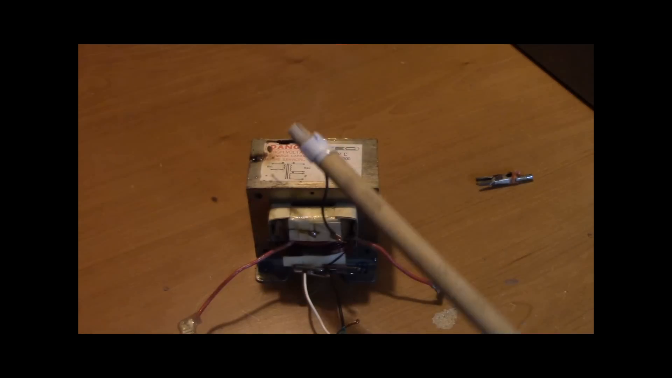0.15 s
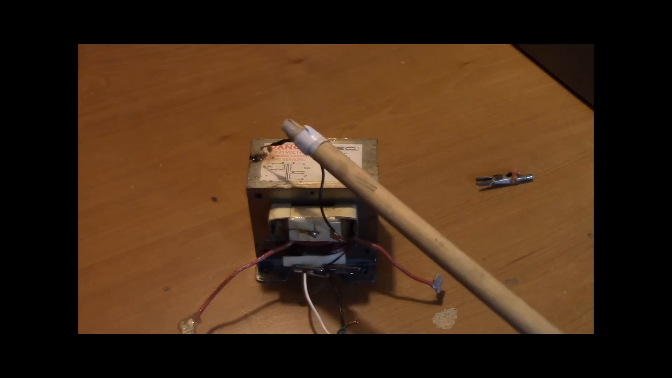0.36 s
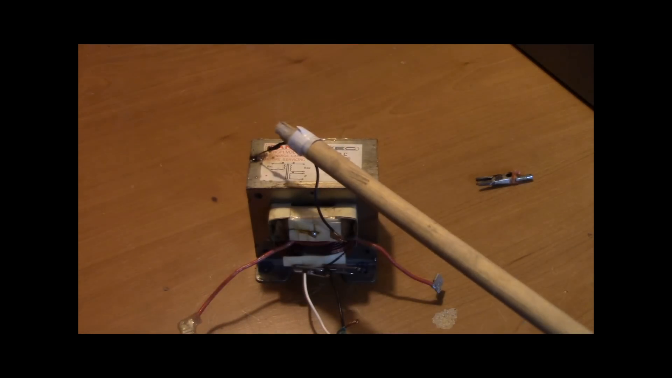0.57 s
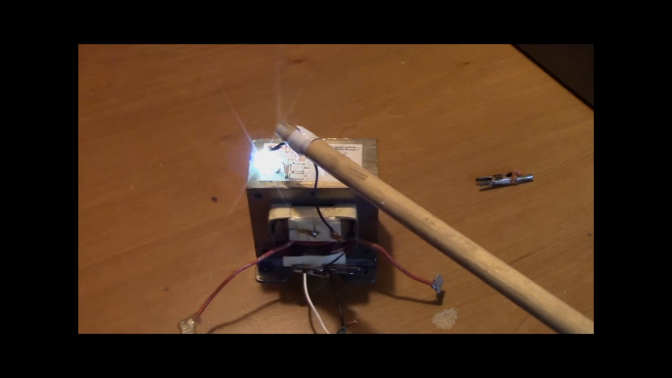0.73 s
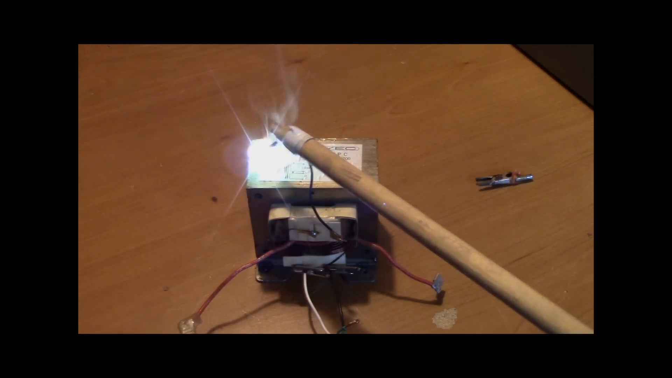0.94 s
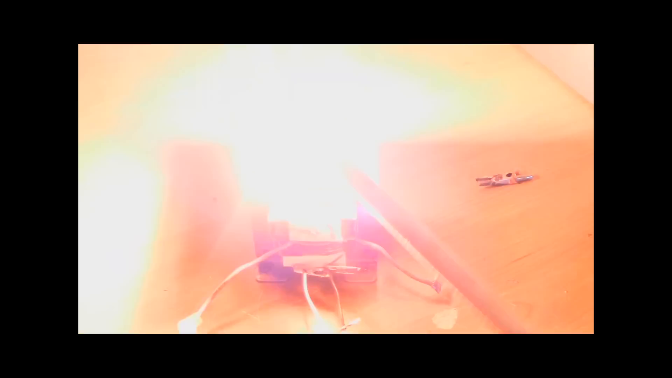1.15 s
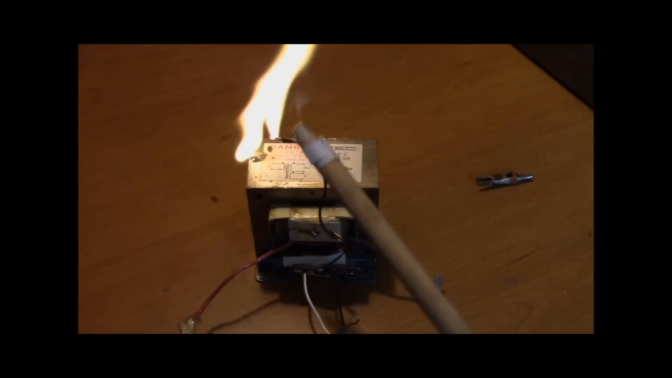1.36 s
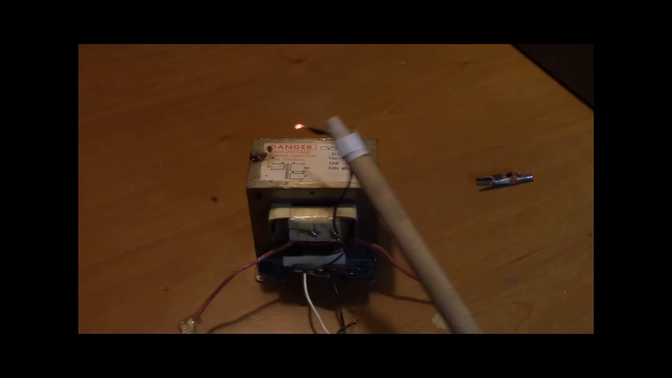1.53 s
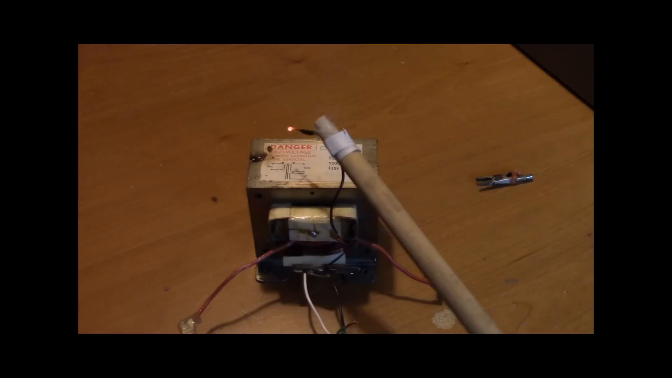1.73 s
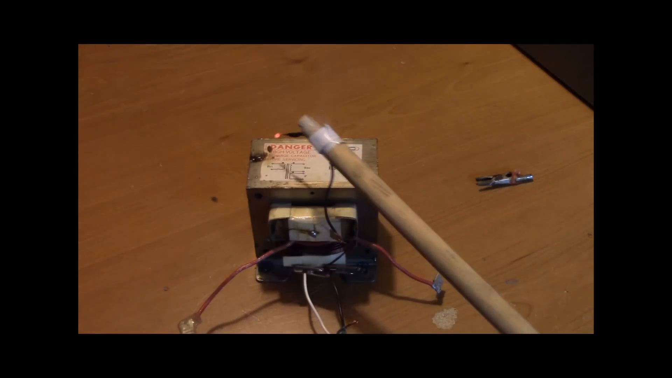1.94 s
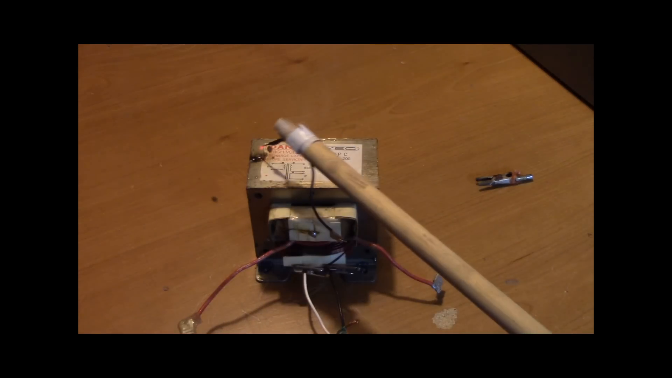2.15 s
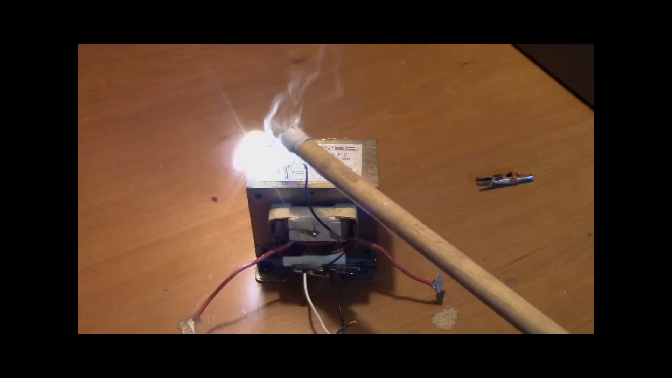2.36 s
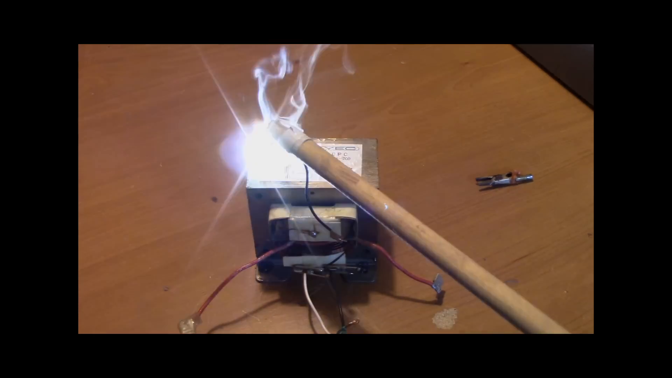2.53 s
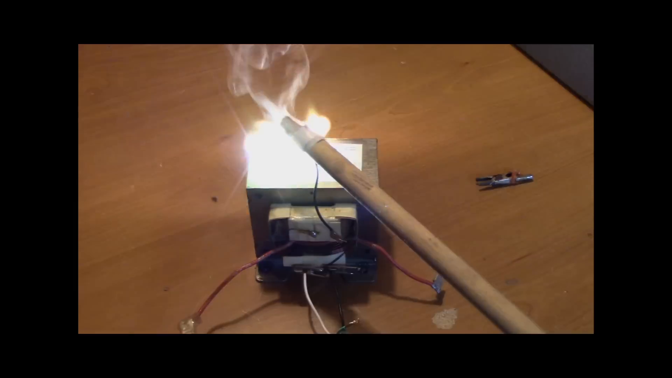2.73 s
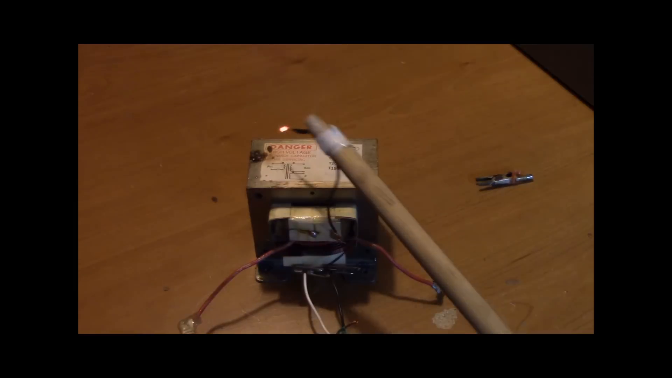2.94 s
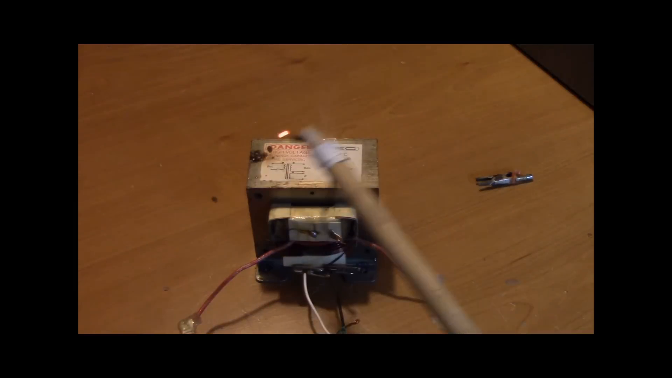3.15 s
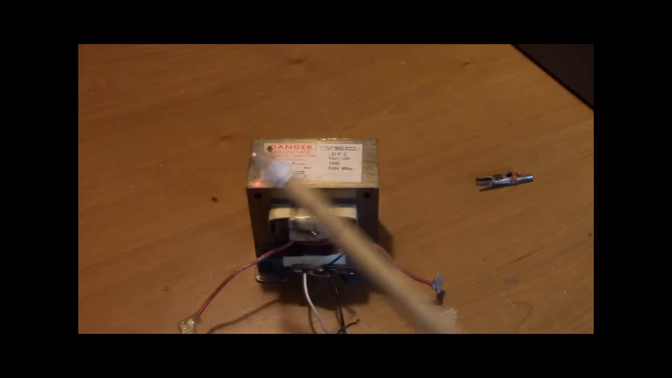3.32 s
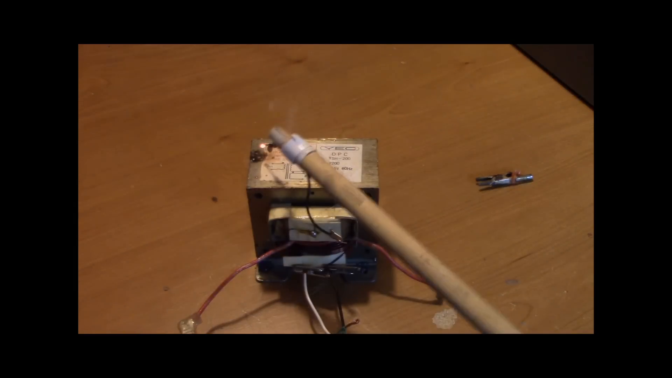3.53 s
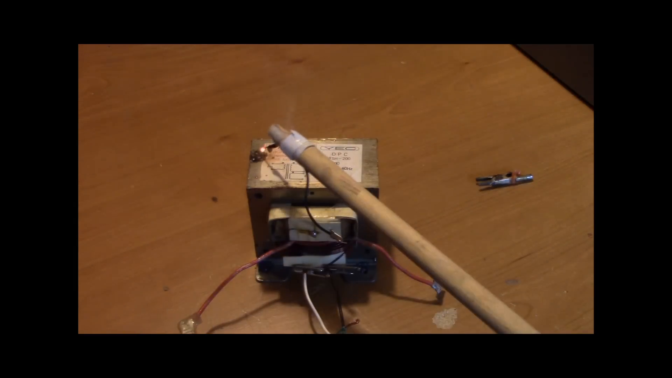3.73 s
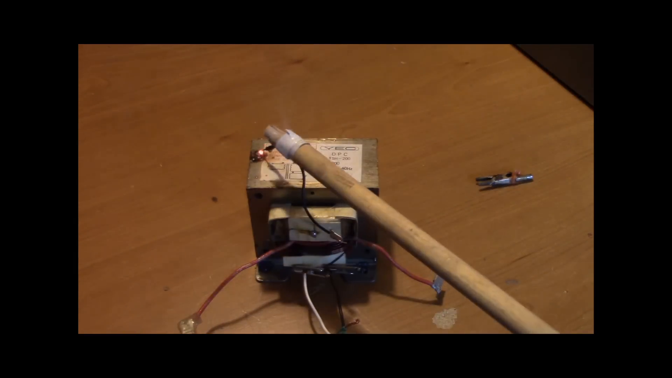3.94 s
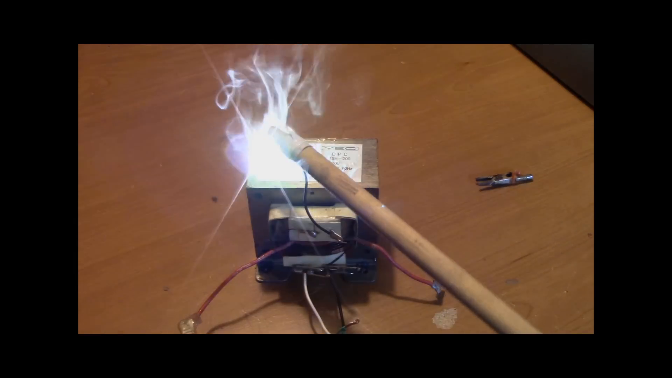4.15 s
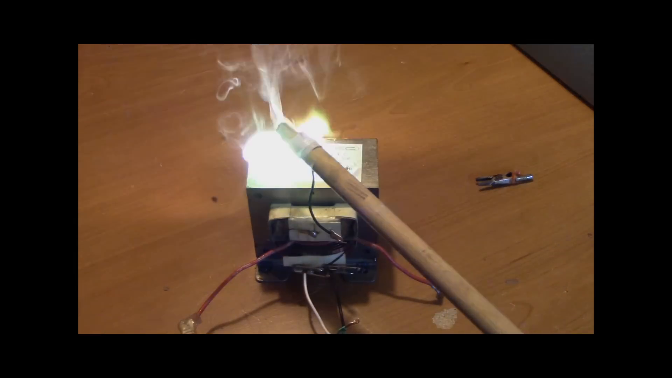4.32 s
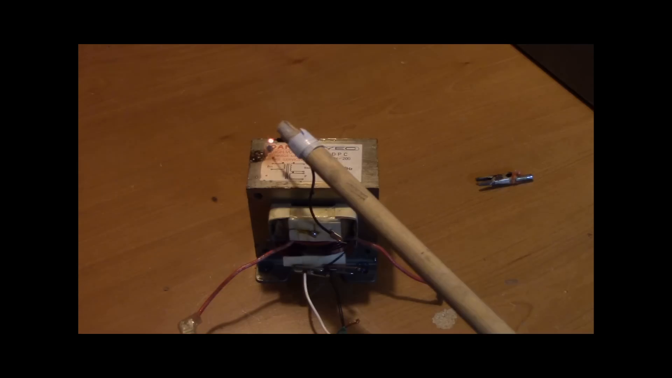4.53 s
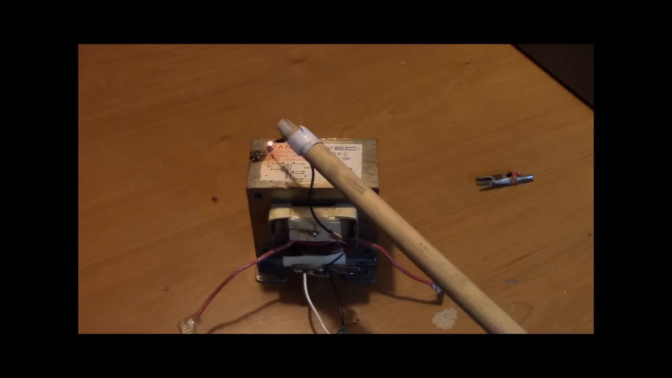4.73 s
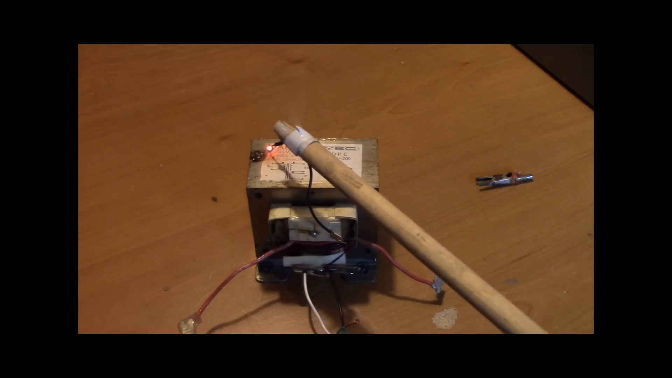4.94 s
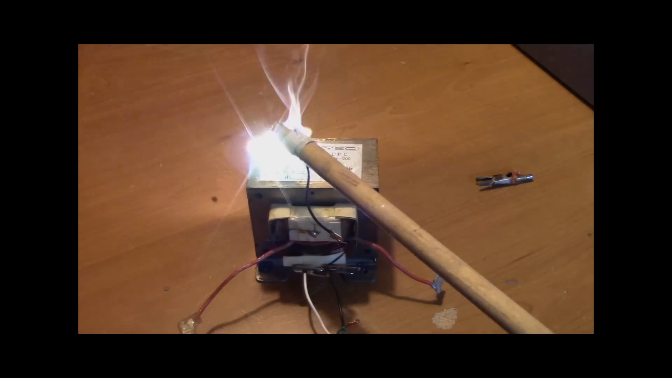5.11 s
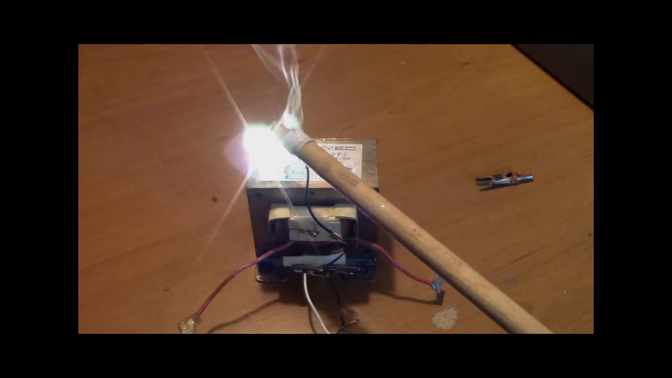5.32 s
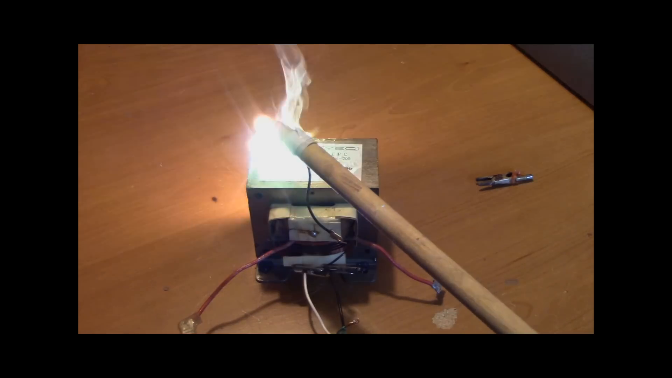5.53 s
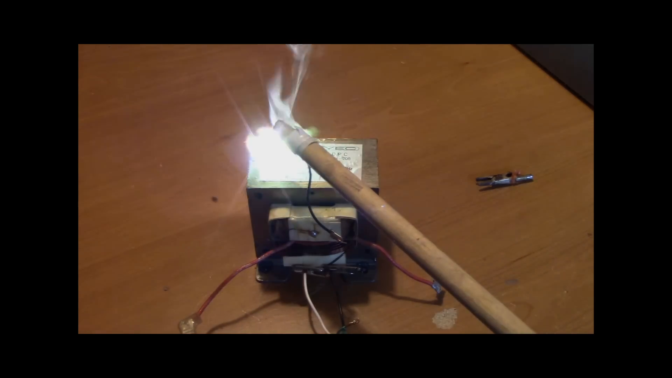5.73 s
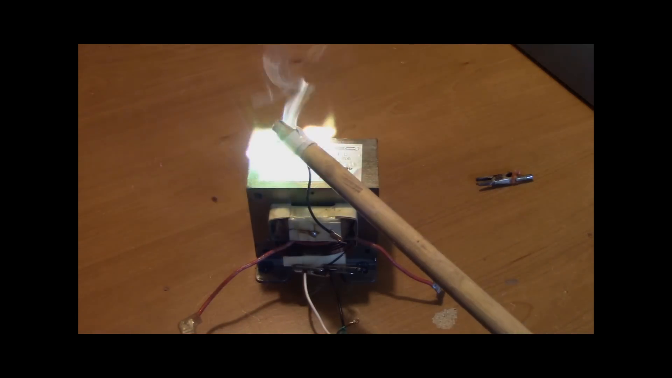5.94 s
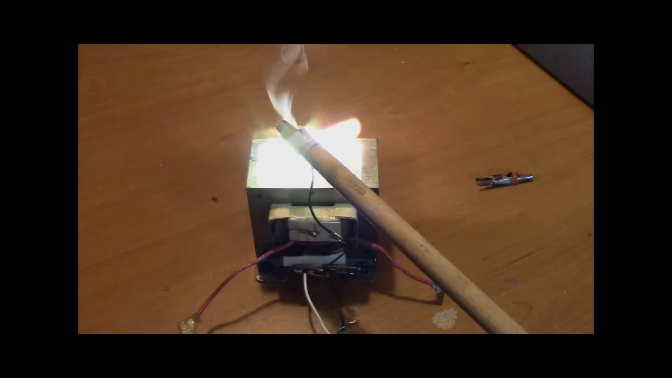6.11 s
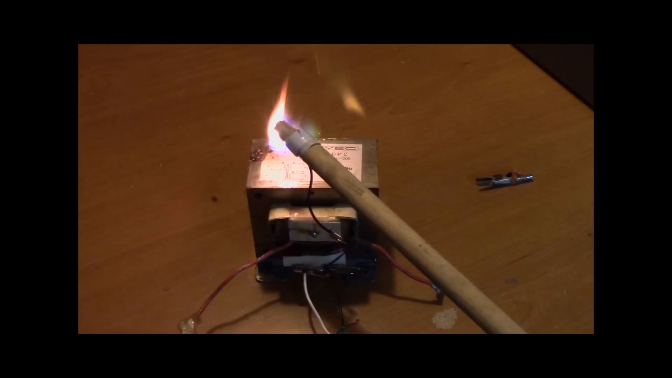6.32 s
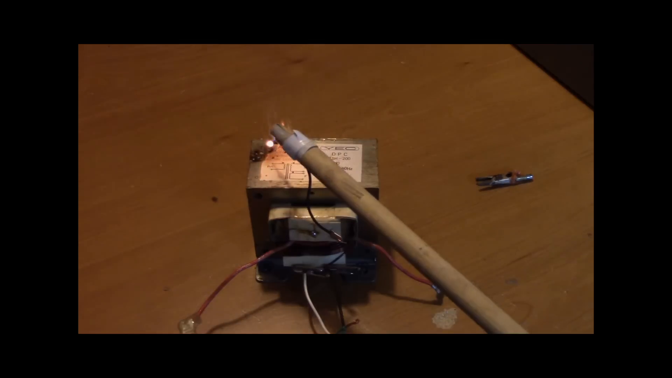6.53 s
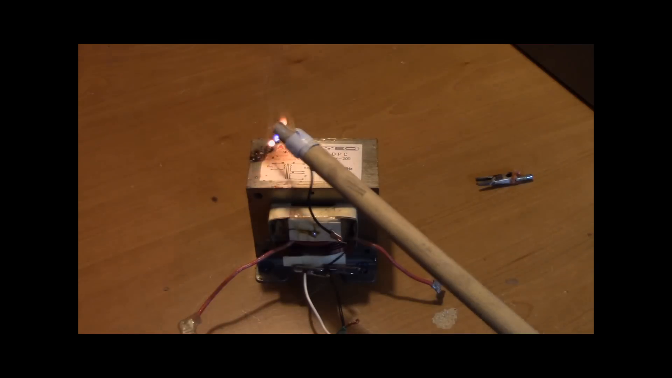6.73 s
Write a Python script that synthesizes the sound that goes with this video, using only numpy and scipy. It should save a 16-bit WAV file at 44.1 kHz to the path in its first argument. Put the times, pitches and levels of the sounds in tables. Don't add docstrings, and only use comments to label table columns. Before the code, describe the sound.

A transformer hums low and steadily on a wooden desk in a small room. Electric arcs catch with weak ticks, then explode into loud, rapid, buzzing snaps, sizzle and dull thumps, stopping abruptly. Several bursts of different length follow, the last the longest. In the quiet gaps, thin high whistles slide down and hot metal ticks faintly. Close single microphone, loudest spikes saturated.

```python
import sys
import numpy as np
from scipy import signal
from scipy.fft import rfft, irfft
from scipy.io import wavfile

SR = 44100
rng = np.random.default_rng(int(sys.argv[2]) if len(sys.argv) > 2 else 0)


def store_pcm(level_fs):
    pcm = np.round(np.clip(level_fs, -1, 1) * 32767).astype(np.int16)
    wavfile.write(sys.argv[1], SR, np.atleast_2d(pcm).T)


def gain_from_db(level_db):
    decades = np.asarray(level_db, float) / 20
    return 10 ** decades


N = 302967
TIME = np.arange(N) / SR
MAINS_HZ = 60.01
PEAK_PHASE = 0.17


def rms_one(x):
    return x / np.sqrt(np.mean(x ** 2) + 1e-20)


def at_hz(points, hz):
    table_hz, values = np.transpose(points)
    return np.interp(np.log(hz + 1), np.log(table_hz), values)


def coloured(spectrum, size):
    white = rfft(rng.standard_normal(size))
    gain = gain_from_db(at_hz(spectrum, np.fft.rfftfreq(size, 1 / SR)))
    return rms_one(irfft(white * gain, size))


def cut(x, hz, kind):
    return signal.sosfilt(signal.butter(2, hz, kind, fs=SR, output="sos"), x)


def resonance(x, hz, width_hz):
    r = np.exp(-np.pi * width_hz / SR)
    zeros = np.array([1, 0, -1]) * (1 - r * r) / 2
    poles = [1, -2 * r * np.cos(2 * np.pi * hz / SR), r * r]
    return signal.lfilter(zeros, poles, x + 1e-18)


def clicks(times, gains):
    out = np.zeros(N)
    np.add.at(out, np.round(np.asarray(times) * SR).astype(int), gains)
    return out


# first strike in seconds, last strike
# in seconds, peak level in dB, second strike level in dB.
RESTRIKE_RUNS = [(0.9617, 1.0118, -5, -8), (1.0288, 1.0633, -2, -30), (1.0946, 1.1277, -5, -8),
                 (2.2791, 2.2969, -2.5, -30), (2.3463, 2.3639, -5.5, -30), (2.5611, 2.5779, -3.5, -12),
                 (2.6119, 2.629, -2, -30), (2.6544, 2.6711, -7.5, -30), (2.7791, 2.7951, -7, -30),
                 (3.8468, 3.8636, -5, -30), (4.053, 4.1531, -4, -10), (4.1441, 4.2615, -2, -16),
                 (4.2946, 4.394, -6.5, -14), (5.1368, 5.2698, -4.5, -10), (5.3029, 5.3197, -4.5, -30),
                 (5.3098, 5.4108, -3, -4.5), (5.4266, 5.5105, -2, -5), (5.537, 5.586, -5, -30),
                 (5.5442, 5.5774, -2.5, -30), (5.6188, 5.7522, -3.5, -9), (5.6284, 5.7288, -4, -20),
                 (5.7609, 5.8115, -4, -20), (5.7699, 5.886, -3, -16), (6.1102, 6.1774, -7, -16),
                 (6.2273, 6.2436, -5, -30)]
# time in seconds, peak level in dB.
STRAY_SPARKS = [(1.0809, -10), (1.2624, -9), (2.3113, -2), (2.5218, -6), (2.5531, -9), (2.5985, -10),
                (2.6637, -10), (2.7274, -5), (3.787, -10), (3.8049, -2), (3.8233, -9), (3.8531, -10),
                (4.1708, -9), (5.1272, -3), (5.129, -5), (5.1608, -8), (5.1797, -8), (5.1941, -3),
                (5.2453, -3), (5.5294, -3), (5.6084, -9), (5.8455, -3), (5.8943, -3), (5.9132, -7),
                (5.9267, -2), (5.9466, -8), (5.9603, -3), (5.9942, -5), (6.0276, -5), (6.0604, -2)]
# time in seconds, peak level in dB.
FURTHER_SPARKS = [(0.7016, -25), (0.817, -21), (0.8479, -24.5), (0.883, -25), (0.9154, -18.5), (1.2331, -14),
                  (1.2994, -22), (2.269, -15), (2.3307, -6), (2.4628, -21), (2.52, -12.5), (3.8014, -11.5),
                  (0.9485, -15), (3.9822, -22.5), (4.0015, -25), (5.0988, -19.5), (5.1042, -15)]


def breakdowns(jitter_s=0.0003, spread_db=1.5, second_wait_s=(0.0012, 0.0022)):
    strikes = []
    for first, last, db, second_db in RESTRIKE_RUNS:
        for s in np.linspace(first, last, round((last - first) * MAINS_HZ) + 1):
            strikes.append((s, db, second_db))
    strikes = np.array(strikes)
    luck = rng.standard_normal((len(strikes), 3))
    wait = rng.uniform(*second_wait_s, len(strikes))
    s = strikes[:, 0] + jitter_s * luck[:, 0]
    db = strikes[:, 1:] + spread_db * luck[:, 1:]
    return np.r_[np.c_[s, db[:, 0]], np.c_[s + wait, db[:, 1]], STRAY_SPARKS, FURTHER_SPARKS]


def sparks():
    s, db = breakdowns().T
    impulse = np.eye(1, 400)[0]
    shape = cut(cut(cut(impulse, 8000, "low"), 19000, "low"), 320, "high")
    shape = shape + 0.5 * resonance(shape, 4400, 2500)
    strikes = clicks(s - np.argmax(shape) / SR, gain_from_db(db + 4.6))
    return -np.convolve(strikes, shape / shape.max())[:N]


def arc_state(rows):
    s, power_db, length = np.transpose(rows)
    sizzle_db = power_db - 14 * length
    thump_db = power_db - 29.5 + 30.5 * length
    brightness = 1 + 0.07 * (sizzle_db + 10)
    return np.c_[s, sizzle_db, thump_db, brightness]


# time in seconds, power in dB, column length from 0 to 1.
SHORT_ARCS = [
    [(0.7, -23, 0.28), (0.94, -20.5, 0.34), (0.966, -12, 0.3), (1.062, -5.5, 0.76), (1.126, -4.5, 0.92),
     (1.224, -16, 0.96), (1.256, -14, 1), (1.268, -11, 0.94), (1.341, -16, 0.96)],
    [(2.268, -20, .65), (2.278, -6.5, 0.54), (2.302, -4, 0.83), (2.37, -6.5, 0.34)],
    [(2.465, -20.5, 0), (2.51, -17, 0.6), (2.545, -12.5, 0.47), (2.565, -9, .64), (2.689, -4.5, 0.82),
     (2.803, -6.5, 0.84), (2.82, -27, .99)],
    [(3.785, -13.5, 0.4), (3.822, -9, 0.65), (3.851, -7, 0.55), (3.87, -17, 0.4)],
    [(3.981, -19, 0.24), (4.04, -14, 0.3), (4.053, -21.5, 0.68), (4.247, -12, 0.77), (4.273, -4, 0.87),
     (4.4, -8, 0.79)],
]
# time in seconds,
# power in dB, column length from 0 to 1.
LONG_ARC = [
    [(5.098, -12, 0.59), (5.132, -11.5, 0.5), (5.16, -5.5, 0.9), (5.248, -11.5, 0.3), (5.298, -9.5, 0.4)],
    [(5.302, -15.5, 0.45), (5.398, -14.5, .54), (5.56, -11, 0.72), (5.625, -6.5, 0.8), (5.668, -11.5, 0.77),
     (5.745, -12, 0.77), (6.102, -2.5, 0.73), (6.178, -4, 0.76), (6.212, -13.5, 0.2)],
    [(6.214, -16, .5), (6.224, -13, 0.8), (6.23, -2.5, 0.91), (6.27, -17, .98)],
]


def while_burning(column):
    out = np.zeros(N)
    for rows in map(arc_state, [*SHORT_ARCS, *LONG_ARC]):
        on = (TIME >= rows[0, 0]) & (TIME < rows[-1, 0])
        out[on] = column(lambda k: np.interp(TIME[on], rows[:, 0], rows[:, k]))
    return out


def sizzle(per_s=6000.0, spread_db=7.0, gating=0.74):
    cycle = np.cos(4 * np.pi * (MAINS_HZ * TIME - PEAK_PHASE))
    chance = per_s / SR * (1 + gating * cycle)
    sizes = gain_from_db(spread_db * np.minimum(rng.exponential(1, N), 4))
    discharges = sizes * rng.choice([-1, 1], N) * (rng.random(N) < chance)
    hiss = rms_one(cut(cut(discharges, 8900, "low"), 1400, "high"))
    return hiss * while_burning(lambda col: gain_from_db(col(1) - 13.0))


def flame(jitter_s=0.0005, spread_db=2.6):
    s = np.arange(PEAK_PHASE, MAINS_HZ * TIME[-1] - 1, 0.5) / MAINS_HZ
    luck = rng.standard_normal((len(s), 2))
    push = -clicks(s + jitter_s * luck[:, 0], gain_from_db(spread_db * luck[:, 1]))
    dull = rms_one(cut(cut(push, 430, "low"), 150, "high"))
    sharp = rms_one(cut(cut(push, 1300, "low"), 150, "high"))
    bright = while_burning(lambda col: np.clip(col(3), 0, 1))
    level = while_burning(lambda col: gain_from_db(col(2) - 12.5))
    return ((1 - bright) * dull + bright * sharp) * level


# time in seconds, peak level in dB.
THUMPS = [(0.828, -17.5), (0.958, -12), (1.091, -19.5), (1.273, 5), (2.279, -8.5), (2.517, -22),
          (2.561, -7), (2.72, -8), (3.783, -12), (3.838, -4.5), (4.051, -16), (4.275, -7), (4.325, -4.5),
          (4.356, 1), (4.394, -1), (5.11, -5), (5.124, -1.5), (5.806, -14), (5.955, 4), (6.056, -4.5),
          (6.224, -14)]


def thumps():
    s, db = np.transpose(THUMPS)
    return -cut(cut(clicks(s + 0.001, gain_from_db(db + 15.5)), 1200, "low"), 100, "high")


def loaded_core():
    load = cut(while_burning(lambda col: gain_from_db(col(2) - 12.0) + gain_from_db(-45.0)), 25, "low")
    return load * np.sin(4 * np.pi * MAINS_HZ * TIME)


# multiple of the mains frequency, level in dB rms.
HUM = [(2, -55), (4, -73), (6, -69), (8, -69.5), (10, -54), (11, -80.5), (12, -70), (14, -72.5),
       (16, -86.5), (32, -77.5)]


def hum():
    out = np.zeros(N)
    for multiple, db in HUM:
        out += np.sqrt(2) * gain_from_db(db) * np.sin(2 * np.pi * (multiple * MAINS_HZ * TIME + rng.random()))
    return out


# time in seconds, peak level in dB, low mode in Hz, high mode in Hz.
TICKS = [
    (0.115, -41, 3530, 6900),
    (1.4466, -38.5, 6600, 10500),
    (3.026, -44.5, 3200, 6640),
    (3.157, -46, 3270, 7600),
    (3.2074, -46.5, 3670, 6900),
    (3.621, -52, 4080, 6280),
    (4.9471, -48.5, 4630, 7640),
]


def ticks():
    out = np.zeros(N)
    for s, db, low_hz, high_hz in TICKS:
        hit = clicks([s], gain_from_db(db + 19.5))
        out += resonance(hit, low_hz, 600) + resonance(hit, high_hz, 1504) + 0.04 * cut(hit, 9000, "low")
    return out


# start in seconds, end in seconds, start pitch in Hz,
# end pitch in Hz, level in dB rms.
ARCHED_WHISTLES = [(1.40, 1.64, 10250, 8300, -66), (1.45, 1.65, 8650, 7700, -73),
                   (1.41, 1.51, 11200, 11100, -75), (1.64, 1.80, 9800, 8800, -76),
                   (4.49, 4.625, 9450, 7900, -68), (4.47, 4.64, 14250, 11900, -74)]
# start in seconds, end in seconds, start pitch in Hz,
# end pitch in Hz, level in dB rms.
SLIDING_WHISTLES = [(1.755, 2.02, 13250, 7700, -72), (1.9, 2.01, 9300, 7600, -76),
                    (4.55, 4.70, 10600, 7500, -73), (4.62, 4.75, 13000, 9500, -72),
                    (4.74, 4.83, 10600, 7600, -72)]


def whistles(fade_s=0.02, arch_bend=4.0, slide_bend=1.3):
    out = np.zeros(N)
    for rows, bend in ((ARCHED_WHISTLES, arch_bend), (SLIDING_WHISTLES, slide_bend)):
        for start, end, start_hz, end_hz, db in rows:
            progress = np.clip((TIME - start) / (end - start), 0, 1)
            hz = start_hz + (end_hz - start_hz) * progress ** bend
            fade = np.clip(np.minimum(TIME - start, end - TIME) / fade_s, 0, 1)
            flicker_db = 2.6 * rms_one(cut(rng.standard_normal(N), 40, "low"))
            tone = np.sin(2 * np.pi * np.cumsum(hz) / SR)
            out += np.sqrt(2) * gain_from_db(db + flicker_db) * fade * tone
    return out


# delay in seconds, level in dB.
ECHOES = [(.00029, -4), (.00045, -14), (.00129, -12), (.00195, -3), (.00215, -7), (.00281, -6),
          (.00333, -11), (.00395, -9)]
# frequency in Hz, time to fall 60 dB in seconds.
ROOM_T60 = [(100, 0.52), (260, 0.28), (700, 0.25), (1840, .22), (4850, 0.21), (12800, 0.16)]
# frequency in Hz, density in dB per Hz.
ROOM_COLOUR = [(100, -4.5), (250, -2), (600, 1.5), (1500, 5.5), (3000, 2), (6000, 0.5), (10000, -0.5),
               (16000, -3)]
# frequency in Hz, width in Hz, level in dB.
ROOM_PEAKS = [(185, 25, -14), (245.6, 9.7, -21), (315.8, 10, -23), (338.6, 12, -17.5), (459, 42, -24),
              (560.6, 15, -15), (635, 12, -19), (857.5, 25, -14.5), (1065, 66, -4), (1464, 140, -1),
              (1789, 10, -18.5), (2620, 43, -8.5), (3270, 140, 1), (4676, 260, 6)]


def room_response(tail_db=-24.5, peaks_db=3.0, build_s=0.003, size=22050):
    t = np.arange(size) / SR
    out = np.zeros(size)
    out[0] = 1
    for delay_s, db in ECHOES:
        out[int(round(delay_s * SR))] += gain_from_db(db)
    noise = rfft(coloured(ROOM_COLOUR, size))
    octave = np.log2(np.fft.rfftfreq(size, 1 / SR) / 62.5 + 1e-9)
    tail = np.zeros(size)
    for k in range(9):
        band = irfft(noise * np.clip(1 - abs(octave - k), 0, 1), size)
        tail += band * gain_from_db(-60 * t / at_hz(ROOM_T60, 62.5 * 2 ** k))
    for hz, width_hz, db in ROOM_PEAKS:
        tail += gain_from_db(db + peaks_db) * np.sin(2 * np.pi * hz * t) * np.exp(-np.pi * width_hz * t)
    return out + gain_from_db(tail_db) * tail * (1 - np.exp(-(t / build_s) ** 2))


# frequency in Hz, density in dB per Hz.
FLOOR = [(9, -30.5), (16, -1), (40, 6.5), (60, -2), (130, -17.5), (250, -18.5), (500, -28.5), (1000, -30.5),
         (1900, -34), (3000, -36.5), (12700, -43.5), (14300, -53), (14700, -74.5)]


def room_noise():
    return gain_from_db(-43.0) * coloured(FLOOR, N)


def scene():
    near = signal.fftconvolve(sparks() + ticks(), room_response())
    near += signal.fftconvolve(sizzle(), room_response())
    near += signal.fftconvolve(flame() + thumps(), room_response(tail_db=-25.0))
    return (near[:N] + loaded_core() + hum() + whistles() + room_noise())[None]


def roll_off(x):
    return signal.sosfilt(signal.butter(12, 16000, fs=SR, output="sos"), x)


def record(dry):
    held = dry / (1 + np.abs(dry) ** 4) ** 0.25
    steep_cut = signal.cheby2(16, 50, 16150, fs=SR, output="sos")
    return roll_off(signal.sosfilt(steep_cut, held))


dry = scene()
out = record(dry)
store_pcm(out)
```